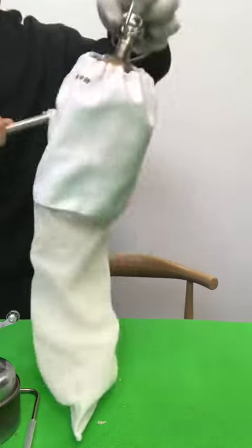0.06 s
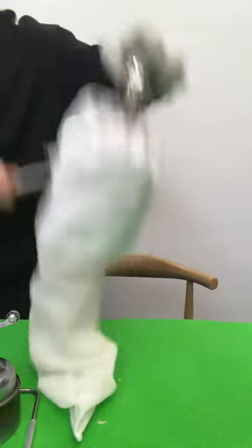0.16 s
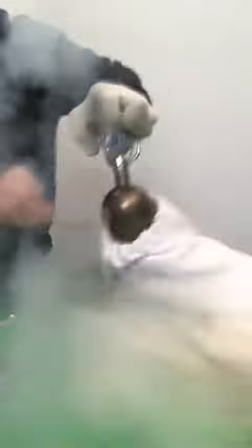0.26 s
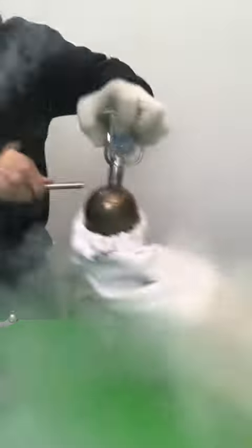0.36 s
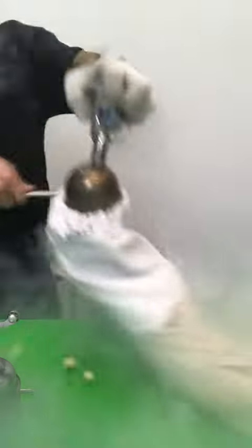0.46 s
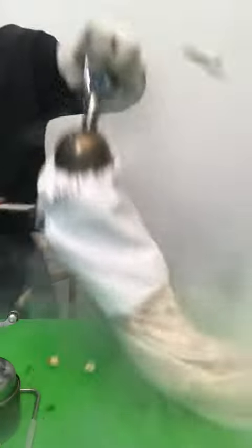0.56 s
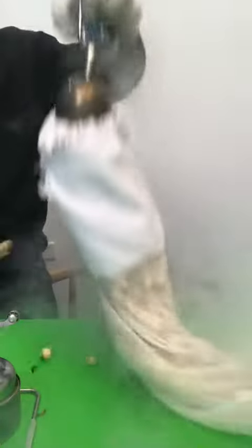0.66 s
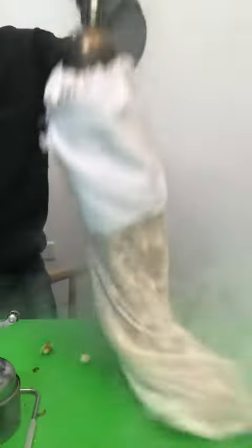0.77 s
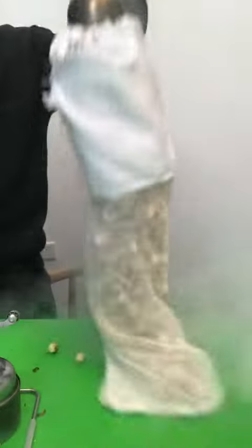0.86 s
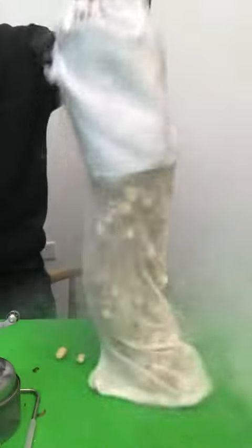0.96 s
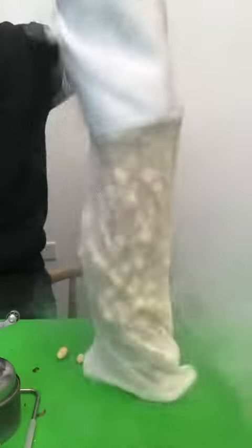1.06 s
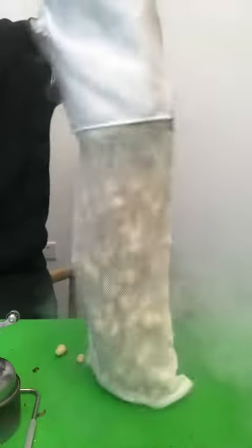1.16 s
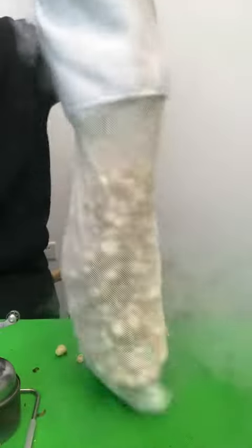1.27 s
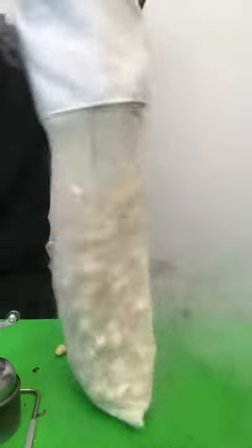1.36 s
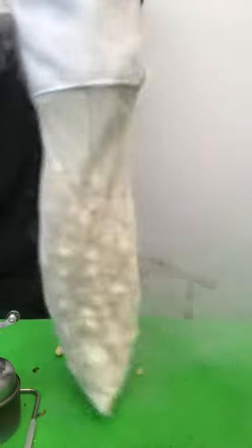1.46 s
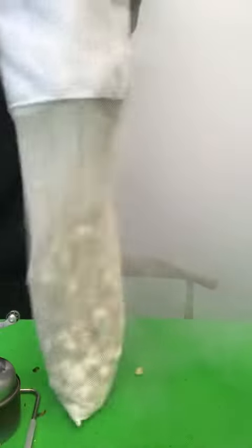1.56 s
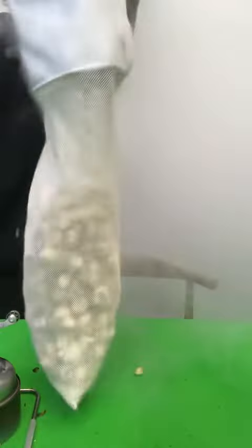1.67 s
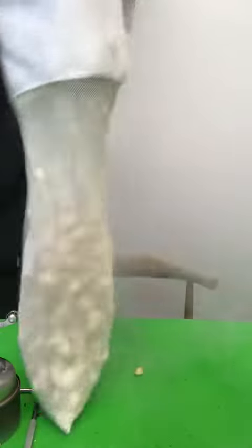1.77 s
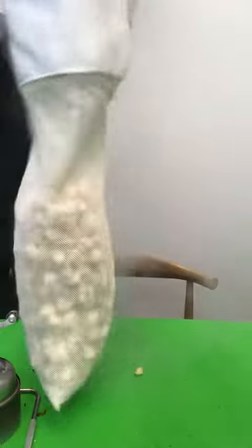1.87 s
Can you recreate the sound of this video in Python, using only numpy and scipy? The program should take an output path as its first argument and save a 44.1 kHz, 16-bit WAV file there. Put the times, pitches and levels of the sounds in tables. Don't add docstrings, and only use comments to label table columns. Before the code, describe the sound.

A pressure popper bursts with a loud bang and booming steam blast, then light metallic rattling

```python
import sys
import numpy as np
from scipy import signal
from scipy.fft import rfft, irfft, next_fast_len
from scipy.io import wavfile
from scipy.ndimage import uniform_filter1d

SR = 44100
rng = np.random.default_rng(int(sys.argv[2]) if len(sys.argv) > 2 else 0)


def unload_wav(signal):
    wavfile.write(
        sys.argv[1],
        SR,
        np.round(np.clip(np.atleast_2d(signal).T, -1, 1) * 32767).astype(np.int16),
    )


def ratio_of_db(decibels):
    return 10 ** (np.asarray(decibels, float) / 20)


N = 83790

# f/Hz, density level/dB [dB per Hz]
AIR_SPECTRUM = [(20, -2), (50, 0.5), (110, -10), (220, -14.5), (500, -27.5), (930, -24), (4000, -40.5),
                (16000, -62.5)]
AIR_DB, AIR_TOP_FADE_DB, AIR_LOW_FADE_DB = -47.5, -1, -3
HUM_HZ, HUM_DB = 136.7, -52

# t/s, level/dB, f/Hz
KNOCKS = [
    (1.2035, -39.5, 2400),
    (1.2045, -38.5, 970),
    (1.454, -29, 840),
]
KNOCK_T60_S = 0.0073

# t/s, level/dB
BAR_STRIKES = [
    (1.47, -53),
    (1.811, -45),
    (1.86, -42),
]
BAR_HZ, BAR_T60_S = 7063, 0.4

# t/s, level/dB
BAG_SNAPS = [
    (.447, -11),
    (1.4268, -21),
    (1.5973, -23),
    (1.6596, -41),
    (1.7948, -15),
    (1.8268, -22),
]
FLOP_S, FLOP_DB, FLOP_T60_S = 0.42, -40.5, 0.14

# t/s, level/dB
SHAKING = [
    [(0.95, -76), (1.046, -59), (1.13, -62), (1.154, -87.5), (1.186, -83), (1.19, -66)],
    [(1.19, -65), (1.248, -48.5), (1.376, -56.5), (1.436, -43), (1.496, -46.5), (1.545, -66)],
    [(1.545, -76), (1.559, -50), (1.683, -46), (1.721, -59), (1.803, -42.5), (1.9, -52)],
]
# f/Hz, level/dB, t60/s
LID_MODES = [(1380, -5, 0.022), (2750, -7, 0.043), (3065, -14, 0.05), (3970, -26, 0.03), (4760, -19, 0.033),
             (4770, -13, 0.032), (4860, -15, .04), (4970, -8, 0.032), (5202, -9.5, 0.03),
             (5600, -5.5, 0.014), (8260, -25, 0.017), (9900, -41, 0.0055), (10910, -17.5, 0.036),
             (11100, -33, .004)]
RATTLES_PER_S, RATTLE_DB = 300, -4

# f/Hz, density level/dB
GRAIN_SPECTRUM = [(240, -15.5), (400, -12.5), (1730, -15), (2710, -10.5), (3580, -14.5), (4800, -9.5),
                  (6050, -19.5), (9610, -15.5), (16000, -41)]
# t/s, level/dB, t60/s, extra treble level/dB
GRAIN_SLAPS = [(1.04, -62.5, 0.23, 6.5), (1.203, -59, 0.17, -3.0), (1.2435, -44.5, 0.051, -1),
               (1.272, -44.5, 0.055, -1), (1.385, -47.5, 0.14, -15), (1.4273, -43, 0.032, 6),
               (1.478, -46.5, 0.097, 5.5), (1.559, -42.5, 0.04, 7), (1.572, -42.5, 0.1, -0.5),
               (1.5965, -40, 0.17, -11), (1.641, -39, 0.033, -4), (1.6605, -40.5, 0.037, -14),
               (1.754, -40.5, 0.051, 4.5), (1.795, -39.5, 0.066, 11), (1.81, -45.5, 0.13, 5),
               (1.822, -45.5, 0.14, 0)]
RUSTLE_DB, TREBLE_FROM_HZ = -5.5, 7000

# t/s, peak level/dB, t60/s, f/Hz
LID_CLINKS = [(0.74, -56.5, 0.041, 4770), (1.042, -56.5, 0.19, 4870), (1.0896, -80, 0.078, 4830),
              (1.2029, -52, 0.088, 4980), (1.245, -38.5, 0.033, 5100), (1.2667, -28.5, 0.041, 4885),
              (1.276, -42.5, 0.069, 4950), (1.387, -43, 0.18, 4760), (1.4256, -30.5, 0.061, 4730),
              (1.433, -39.5, 0.14, 4690), (1.45, -35, 0.05, 4720), (1.4586, -28, 0.041, 4770),
              (1.467, -38, 0.054, 4740), (1.479, -35, 0.029, 4800), (1.5591, -23, 0.033, 4805),
              (1.573, -33, 0.059, 4750), (1.5989, -28.5, 0.08, 4790), (1.606, -30, 0.23, 4794),
              (1.625, -34.5, 0.053, 4774), (1.642, -44, 0.04, 4660), (1.66, -31.5, 0.036, 4810),
              (1.678, -45, 0.05, 4970), (1.7504, -37, 0.054, 4760), (1.7565, -27, 0.042, 4770),
              (1.792, -36, 0.059, 4740), (1.8091, -36, 0.057, 4820), (1.8145, -33, 0.15, 4760),
              (1.823, -30.5, 0.032, 4800), (1.8344, -45, 0.05, 4770), (1.85, -34.5, 0.05, 4870)]
CLINK_RISE_S, STOP_S = 0.00057, 0.0034

PUSH_DB, PUSH_S = -20, 0.028
JET_DB, JET_HOLD_S, JET_SHUT_S, JET_FROM_HZ = -38, 0.14, 0.0098, 5000

BANG_S = 0.2262
LEAK_DB, LEAK_GROWTH_S = -21.5, 0.0019
# t/s after the bang, length/s, peak level/dB
SHOCKS = [
    (0.0, .0007, -1.5),
    (.0010, .0013, 0.5),
    (.0026, .0007, -8),
]
# f/Hz, density level/dB [dB per Hz]
BLAST_SPECTRUM = [(60, -10), (250, -13.5), (680, -16.5), (1000, -10.5), (1380, -22), (1750, -19.5),
                  (6400, -26), (16000, -40)]
# f/Hz, t60/s
ROOM_T60 = [(40, .9), (130, 1.18), (330, 1.065), (680, 0.74), (1000, 0.93), (2200, 0.63), (6000, .5),
            (15000, 0.083)]
BLAST_DB, BLAST_RISE_S = -18, 0.00033
# f/Hz, level/dB, t60/s
BOOM_MODES = [(52, -8.5, 0.49), (80, -10, 0.28), (103.9, -11, 0.78), (131.5, -8, 1.34), (149.2, -21, 0.98),
              (151.8, -13.5, 1.1), (198.7, -3.5, 0.67), (219.8, -16.5, 1.1), (240.5, -12.5, 0.76),
              (265.8, -16, 1.18), (292.4, -18.5, 1.22), (346.6, -24.5, 0.55), (547, -20, .25),
              (1031, -13.5, 0.41)]
BOOM_DB, BOOM_RISE_CYCLES = -10, 3.4

# t/s, level/dB
GAIN_CONTROL = [(.23, 2), (.28, 2.5), (.33, -5), (.37, -8), (.415, -13.5), (.44, -3.5), (.5, -1.5),
                (.6, 2.5), (.75, 0.5)]
CEILING, CUTOFF_HZ = 0.95, 15750


def rms_one(x):
    return x / np.sqrt(np.mean(x ** 2) + 1e-20)


def in_time(rows):
    s, values = np.transpose(rows)
    return np.interp(np.arange(N) / SR, s, values)


def at_hz(points, hz):
    table = np.array(points)
    return np.interp(np.log(hz), np.log(table[:, 0]), table[:, 1])


def since(s):
    t = np.arange(N) / SR - s
    return np.maximum(t, 0), t >= 0


def swell(s, rise, t60):
    t, on = since(s)
    return on * (1 - np.exp(-(t / rise) ** 2)) * ratio_of_db(-60 * t / t60)


def drift(rate):
    r = np.exp(-80 * np.pi * rate / SR)
    slow = signal.lfilter([1], [1, -2 * r, r * r], rng.standard_normal(N // 40 + 2002))[2000:]
    return np.interp(np.arange(N) / 40, np.arange(len(slow)), rms_one(slow))


def clicks_at(s, db):
    out = np.zeros(N)
    index = np.minimum((np.asarray(s) * SR).astype(int), N - 1)
    np.add.at(out, index, ratio_of_db(db))
    return out


def ring(clicks, hz, t60):
    r, w = ratio_of_db(-60 / (t60 * SR)), 2 * np.pi * hz / SR
    return signal.lfilter([0, np.sin(w)], [1, -2 * r * np.cos(w), r * r], clicks + 1e-18)


def noise_between(low, high, order=2):
    sos = signal.butter(order, [low, high], "band", fs=SR, output="sos")
    return signal.sosfilt(sos, rng.standard_normal(N))


def bands(spectrum, patchy_db, shape=lambda hz: 1):
    edges = 20 * 2 ** np.arange(0, 10, 1 / 3)
    white = rng.standard_normal((2, N + SR // 4))
    flat = out = 0
    for k, (low, high) in enumerate(zip(edges, edges[1:])):
        hz = np.sqrt(low * high)
        sos = signal.butter(2, [low, high], "band", fs=SR, output="sos")
        band = signal.sosfilt(sos, white[k % 2])[-N:]
        band = band * ratio_of_db(at_hz(spectrum, hz) + patchy_db * drift(7.3))
        flat = flat + band
        out = out + band * shape(hz)
    return out / np.sqrt(np.mean(flat ** 2))


def air():
    t, after = since(BANG_S)

    def fade(hz):
        top_db = AIR_TOP_FADE_DB * np.clip(np.log2(hz / 2500), 0, 2)
        return ratio_of_db((top_db + AIR_LOW_FADE_DB * (hz < 450)) * after)

    tone = bands(AIR_SPECTRUM, patchy_db=2.0, shape=fade)
    hum = np.sin(2 * np.pi * HUM_HZ * t + 0.8 * drift(5)) * ratio_of_db(2.9 * drift(6.4))
    return ratio_of_db(AIR_DB) * tone + ratio_of_db(HUM_DB) * after * hum


def room(x):
    size = next_fast_len(N + SR)
    hz = np.arange(size // 2 + 1) * SR / size
    t60, response = at_hz(ROOM_T60, hz + 1), 0
    for k, lag in enumerate(rng.uniform(.011, .04, 10)):
        echo = ratio_of_db(-60 * lag / t60) * np.exp(-2j * np.pi * hz * lag)
        response = response + (-1) ** k * echo / (1 - echo)
    return irfft(rfft(x, size) * response, size)[:N]


def bar_and_knocks():
    strikes = uniform_filter1d(clicks_at(*np.transpose(BAR_STRIKES)), size=2)
    out = ring(strikes, BAR_HZ, BAR_T60_S)
    for s, db, hz in KNOCKS:
        knock = uniform_filter1d(clicks_at([s], [db]), size=5)
        out = out + ring(knock, hz, KNOCK_T60_S)
    return out


def bag():
    cloth = noise_between(2500, 11000)
    snap_filter = signal.butter(2, [1000, 7500], "band", fs=SR, output="sos")
    snaps = signal.sosfilt(snap_filter, clicks_at(*np.transpose(BAG_SNAPS)))
    return ratio_of_db(FLOP_DB) * swell(FLOP_S, .006, FLOP_T60_S) * cloth + snaps


def rattle():
    effort = ratio_of_db(in_time(np.concatenate(SHAKING))) * since(SHAKING[0][0][0])[1]
    slaps = bright_slaps = 0
    for s, db, t60, top_db in GRAIN_SLAPS:
        slap = ratio_of_db(db) * swell(s, 0.000335, t60)
        slaps = slaps + slap
        bright_slaps = bright_slaps + slap * ratio_of_db(top_db)

    lid = 0
    for hz, level_db, t60 in LID_MODES:
        sizes = ratio_of_db(2.3 * np.minimum(rng.exponential(1, N), 4)) * rng.choice([-1, 1], N)
        touches = rms_one(sizes * (rng.random(N) < RATTLES_PER_S / SR))
        drive = ratio_of_db(level_db + RATTLE_DB - 16.5) * touches * (effort + 0.31 * slaps)
        lid = lid + ring(drive, hz, t60)

    def grain_level(hz):
        return effort * ratio_of_db(RUSTLE_DB) + (bright_slaps if hz > TREBLE_FROM_HZ else slaps)

    grain = bands(GRAIN_SPECTRUM, patchy_db=4.0, shape=grain_level)
    return lid + grain * ratio_of_db(2.7 * drift(160))


def clinks():
    out = np.zeros(N)
    ends = [row[0] for row in LID_CLINKS[1:]] + [N / SR]
    for (s, db, t60, hz), end in zip(LID_CLINKS, ends):
        tone = np.sin(2 * np.pi * (hz * since(s)[0] + rng.random()))
        stop = np.exp(-since(end)[0] / STOP_S)
        out += ratio_of_db(db + 0.5) * swell(s, CLINK_RISE_S, t60) * stop * tone
    return out


def push_and_jet():
    t, on = since(BANG_S)
    push = ratio_of_db(PUSH_DB) * np.sin(2 * np.pi * np.clip(t / PUSH_S, 0, 1))
    hiss = noise_between(JET_FROM_HZ, 9000, order=1)
    shut = np.exp(-since(BANG_S + JET_HOLD_S)[0] / JET_SHUT_S)
    return push + ratio_of_db(JET_DB + 2.5 * drift(40)) * on * shut * hiss


def leak():
    t, _ = since(BANG_S)
    before = np.minimum(np.arange(N) / SR - BANG_S, 0)
    hiss = uniform_filter1d(rng.standard_normal(N), size=3)
    return ratio_of_db(LEAK_DB) * np.exp(before / LEAK_GROWTH_S - t / 0.0028) * hiss


def shock():
    out = 0
    for s, length, db in SHOCKS:
        u = np.clip((np.arange(N) / SR - BANG_S - s) / length, 0, 1)
        window = np.tanh(1.7 * np.sin(np.pi * u))
        out = out + ratio_of_db(db) * window * np.tanh(5.4 * (1 - 2 * u)) * 0.7
    return out


def blast():
    t, on = since(BANG_S)
    rise = on * (1 - np.exp(-t / BLAST_RISE_S))
    noise = bands(BLAST_SPECTRUM, patchy_db=1.5, shape=lambda hz: ratio_of_db(-60 * t / at_hz(ROOM_T60, hz)))
    return ratio_of_db(BLAST_DB) * rise * noise


def boom():
    t, _ = since(BANG_S)
    out = 0
    for hz, db, t60 in BOOM_MODES:
        rise = min(BOOM_RISE_CYCLES / hz, .018)
        tone = np.sin(2 * np.pi * (hz * t + rng.random()))
        out = out + ratio_of_db(db) * swell(BANG_S, rise, t60) * tone
    return ratio_of_db(BOOM_DB) * out


def bang():
    return shock() + blast() + leak() + boom()


def scene():
    small = clinks() + rattle() + bag() + bar_and_knocks()
    mix = bang() + small + ratio_of_db(-19.5) * room(small) + air() + push_and_jet()
    return mix[None]


def top_cut(x):
    return signal.sosfilt(signal.butter(12, 16630, fs=SR, output="sos"), x)


def record(dry):
    ducked = dry * ratio_of_db(in_time(GAIN_CONTROL) * (np.arange(N) < .95 * SR))
    rounded = ducked / (1 + abs(ducked / CEILING) ** 6) ** (1 / 6)
    low_pass = signal.ellip(10, .3, 70, CUTOFF_HZ, fs=SR, output="sos")
    mix = signal.sosfilt(low_pass, rounded)
    return top_cut(mix)


dry = scene()
out = record(dry)
unload_wav(out)
```